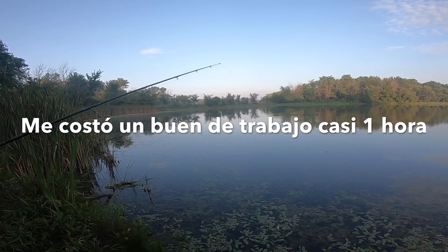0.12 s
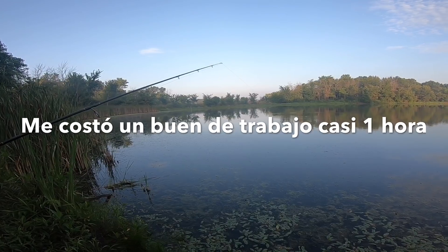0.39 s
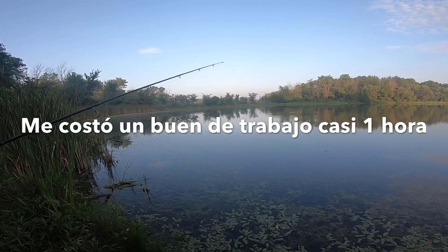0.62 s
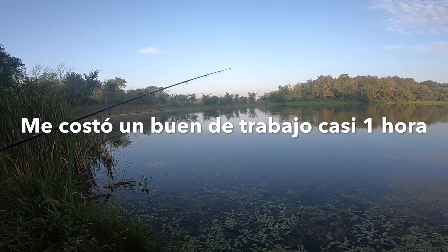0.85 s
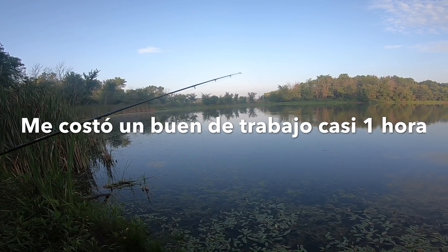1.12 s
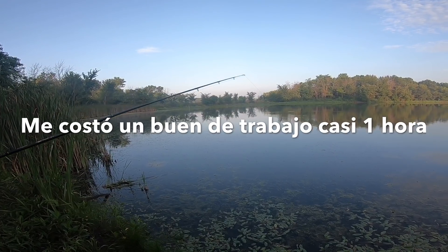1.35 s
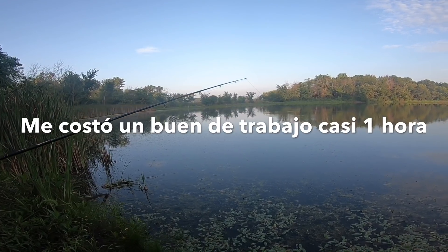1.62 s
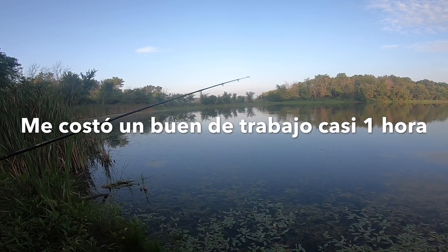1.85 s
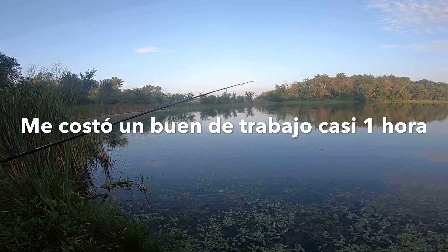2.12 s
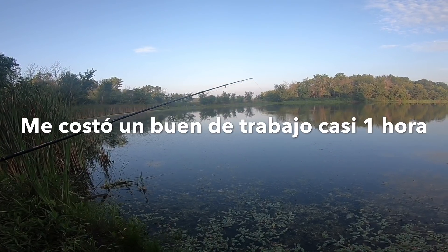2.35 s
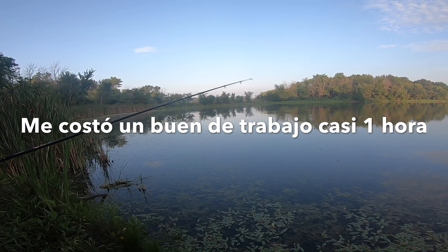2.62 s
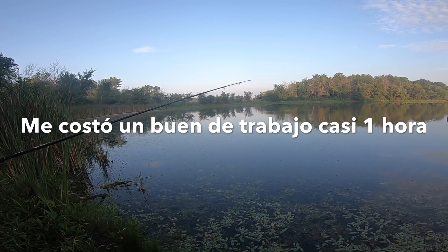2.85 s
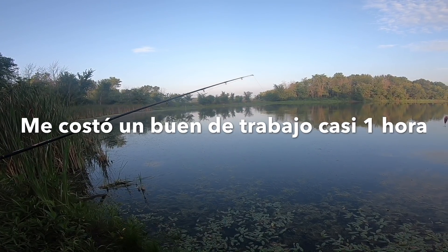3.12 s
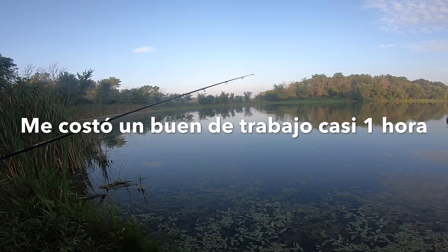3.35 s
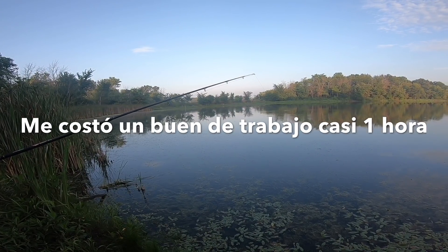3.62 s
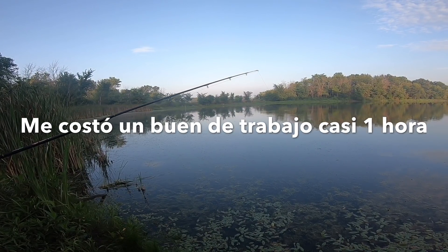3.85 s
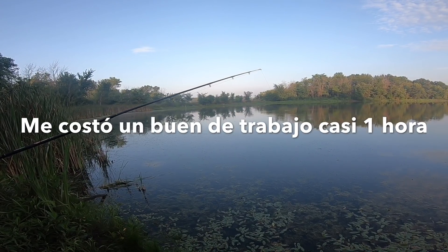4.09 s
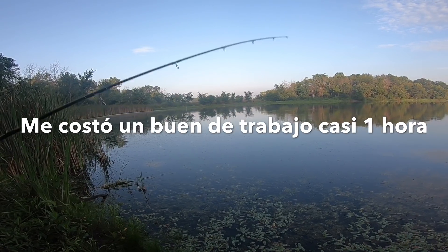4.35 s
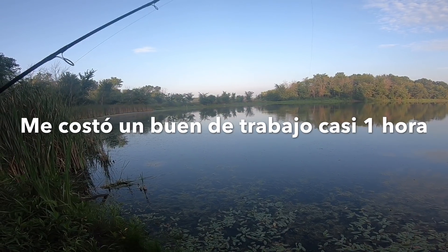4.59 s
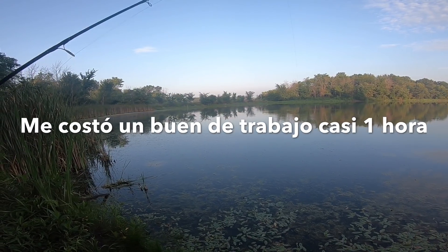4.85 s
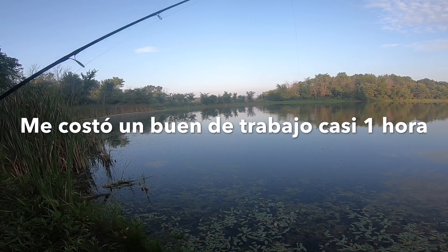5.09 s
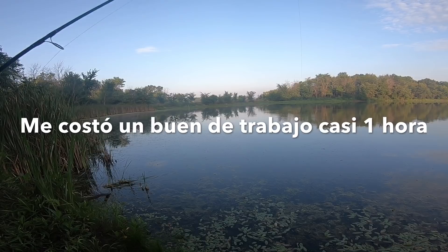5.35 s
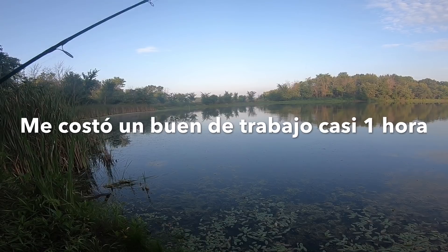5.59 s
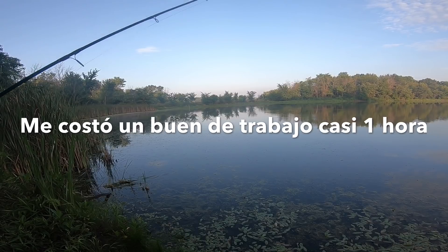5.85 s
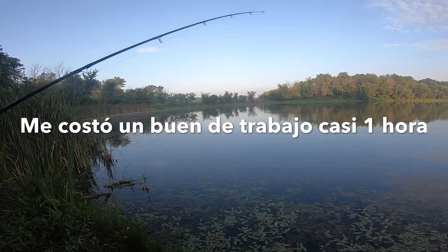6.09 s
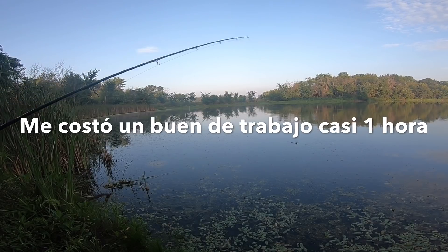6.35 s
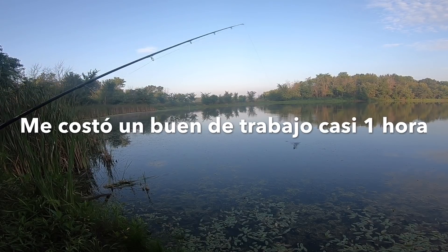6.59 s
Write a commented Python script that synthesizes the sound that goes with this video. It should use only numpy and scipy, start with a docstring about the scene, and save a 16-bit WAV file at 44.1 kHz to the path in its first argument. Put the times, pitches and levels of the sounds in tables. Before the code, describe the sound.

High, silvery insect trilling fills the whole stretch, spread wide in stereo with no single singer standing out. Far traffic murmurs low underneath, a little wind brushes the microphones, and two thin hums waver faintly. A remote engine pulls twice, early and late, with low throbbing drone. Close by, rod and reel tick lightly, finishing with a quick flurry of clicks and grainy rustling.

```python
"""A wide crowd of insects trills near 6 kHz at a lake shore, early morning: noise scraped in bursts, each singer
at its own rate. A distant diesel drones up twice (wavering exhaust orders plus turbulence noise), two thin hums
waver, and fishing tackle ticks (short resonant rings) and rustles (grainy noise) close by. A far road murmurs in
three noise layers and a breath of wind touches the two microphone ports."""
import sys
import numpy as np
from scipy import signal
from scipy.fft import rfft, irfft
from scipy.io import wavfile
from scipy.ndimage import uniform_filter1d

SR = 44100
rng = np.random.default_rng(int(sys.argv[2]) if len(sys.argv) > 2 else 0)


def invert_db(level):
    """Linear amplitude ratio for a level in decibels (20 dB per decade), elementwise."""
    return 10 ** (np.asarray(level, dtype=float) / 20)


def output_pcm(signal):
    """Save a mono or channel-first signal as 16-bit PCM at the path in sys.argv[1].

    Samples are clipped to [-1, 1] before scaling.
    """
    pcm = np.clip(np.atleast_2d(signal).T, -1, 1) * 32767
    wavfile.write(sys.argv[1], SR, np.round(pcm).astype(np.int16))


N = 295911
T = np.arange(N) / SR
FREQ = np.arange(N // 2 + 1) * SR / N + 1  # 1 Hz up, so that log(FREQ) is finite


def curve(table):
    """Columns of a (t/s, value, ..) table at every sample."""
    s, *columns = np.transpose(table)
    return [np.interp(T, s, c) for c in columns]


def along_hz(table):
    """Columns of a (f/Hz, value, ..) table at every bin, interpolated over log frequency."""
    hz, *columns = np.transpose(table)
    return [np.interp(np.log(FREQ), np.log(hz), c) for c in columns]


def unit(x):
    """Scale to rms 1."""
    return x / np.sqrt(np.mean(x ** 2))


def colour(x, table):
    """Filter by a (f/Hz, gain/dB) spectrum."""
    gain_db = along_hz(table)[0]
    return irfft(rfft(x) * invert_db(gain_db), N)


def walk(rate_hz, channels=2):
    """Random levels held 1 / rate_hz and smoothed twice; rms 1."""
    hold = int(SR / rate_hz)
    steps = np.repeat(rng.standard_normal((channels, N // hold + 1)), hold, axis=1)
    smooth = uniform_filter1d(uniform_filter1d(steps, hold), hold)
    return unit(smooth[:, :N])


def swells(steady_db, rows):
    """A steady gain plus bell-shaped swells, rows of (t/s, peak/dB, length/s)."""
    bells = sum(invert_db(db) * np.exp(-(2 * (T - s) / length_s) ** 2) for s, db, length_s in rows)
    return invert_db(steady_db) + bells


def tone(hz, waver_db, rate_hz, drift_rad):
    """Two versions of a far tone: the air makes its level and phase waver."""
    wobble = walk(rate_hz, channels=4)
    # the second phase roams six times as far, so the left-right balance does not hang on the starting phases
    roam = drift_rad * wobble[:2] * [[1], [6]]
    start = rng.uniform(0, 2 * np.pi, (2, 1))
    phase = 2 * np.pi * np.cumsum(hz * np.ones(N)) / SR + roam + start
    return unit(invert_db(waver_db * wobble[2:]) * np.sin(phase))


def insects(count=48, trill_hz=45, spread=.4, sharp=0.49):
    """Each singer scrapes its wing in bursts at its own trill rate; wings ring near 6 kHz, with a faint high band."""
    # wing resonance: f/Hz, relative level/dB
    wing_ring = [(2500, -67), (4300, -38.5), (4660, -28.5), (5250, -9), (5700, -2.5), (6000, 4.5),
                 (6200, 5), (6500, -3), (6850, -15.5), (7150, -34.5), (7600, -41), (8500, -81.5),
                 (16000, -120)][:-1]
    # faint high band of the chorus, strongest near 10.5 kHz: f/Hz, relative level/dB
    high_band = [(7000, -120)] + [(8000, -79), (9500, -61), (10500, -40.5), (12000, -50), (13000, -52.5),
                                  (14000, -68), (15000, -80)]
    chorus_db = -44  # rms of the wing band

    rate_hz = trill_hz * np.exp(spread * rng.standard_normal((count, 1)))
    near = invert_db(1.33 * rng.standard_normal((count, 1)))
    start = rng.random((count, 1))
    coarse = T[::16]
    # trills speed up and slow down a little, out of step with each other
    slip_cycles = 0.022 * np.cumsum(rng.standard_normal((count, len(coarse))), axis=1)
    cycles = rate_hz * coarse + start + slip_cycles
    bursts = near * np.exp(sharp * np.cos(2 * np.pi * cycles))
    # unrelated scrapes add in power, half of the crowd in each version
    power = (bursts ** 2).reshape(2, count // 2, -1).sum(axis=1)
    effort = np.array([np.interp(T, coarse, unit(np.sqrt(p))) for p in power])
    scrape = effort * rng.standard_normal((2, N))
    wing = colour(scrape, wing_ring) * invert_db(0.1 * walk(9.8))
    both = wing + colour(scrape, high_band)
    return both / np.std(wing) * invert_db(chorus_db)


def engine():
    """Exhaust orders of a cycle near 25 Hz, third strongest, with turbulence; a second drone near 100 Hz."""
    # distant engine pulling twice: t/s, third order f/Hz, third order level/dB
    pull = [(0, 71, -45), (.4, 69.5, -60), (1.12, 70, -50.5), (1.25, 72, -43.5), (1.74, 73.5, -36),
            (1.8, 74.5, -50), (1.92, 74.7, -35), (2.2, 74.8, -39.5), (2.52, 74.8, -31.5), (2.76, 74.4, -43),
            (2.88, 73.4, -37), (3.2, 72, -58), (4.7, 68, -58), (5.12, 69.5, -48.5), (5.31, 73.2, -35.5),
            (5.65, 74.5, -36), (5.84, 75.1, -29.5), (5.92, 76, -39.5), (6.13, 76.2, -28.5),
            (6.22, 76.2, -42.5), (6.35, 74.5, -39), (6.45, 71, -52.5), (6.71, 71, -54)]
    # weaker orders: multiple of the cycle rate, level at mean load/dB
    weak_orders = [(2, -58.5), (5, -59), (6, -55.5), (8, -57), (9, -59.5), (10, -61.5), (12, -66)]
    # exhaust turbulence: f/Hz, relative level/dB
    turbulence_colour = [(25, -28), (45, 8), (75, 6), (105, 9.5), (140, 0.5), (220, -45), (500, -120)]
    # second drone: t/s, peak/dB, length/s
    drone_bells = [(0.085, -42, .3), (.66, -52, 0.13), (0.905, -37, 0.16), (1.35, -44.5, 0.16),
                   (1.898, -47.5, 0.85), (2.5, -45.5, 0.34), (3.83, -46.5, 0.21), (4.198, -50, 0.26)]
    drone_start_hz, sag_hz_per_s, drone_db = 102.4, 0.91, -59

    third_hz, third_db = curve(pull)
    load_db = uniform_filter1d(third_db, SR // 4) - third_db.mean()
    third = tone(third_hz, 1.1, 14, 0.36) * invert_db(third_db)
    drone_hz = drone_start_hz - sag_hz_per_s * T
    drone = tone(drone_hz, 2.0, 7.2, 0.29) * swells(drone_db, drone_bells)
    turbulence = unit(colour(rng.standard_normal((2, N)), turbulence_colour)) * invert_db(-46.5 + 0.31 * load_db)
    out = third + drone + turbulence
    for order, db in weak_orders:
        out += tone(third_hz * order / 3, 3.5, 10, 1.37) * invert_db(db + 0.27 * load_db)
    return out


def hums():
    """Two thin tones from far machinery that waver and swell."""
    # steady hums: f/Hz, level/dB
    hum_tones = [(346, -70.5), (384.9, -74)]
    # swells: hum index, t/s, peak/dB, length/s
    hum_bells = [(0, 1.2, -63.5, .9), (0, 3.39, -60, 0.39), (0, 4.56, -64.5, 1.1), (1, 0.56, -55.5, .7),
                 (1, 1.6, -63.5, 0.9), (1, 3.4, -55.5, 0.28), (1, 4.5, -65, 1), (1, 6.17, -68, 1.1)]
    out = 0
    for k, (hz, db) in enumerate(hum_tones):
        own_bells = [row[1:] for row in hum_bells if round(row[0]) == k]
        out = out + tone(hz, 2.5, 8, 1.2) * swells(db, own_bells)
    return out


def tackle():
    """Short noise-fed rings of rod, line and reel, then a grainy rustle as the line is wound."""
    # ticks and creaks: t/s, peak/dB, ring f/Hz, length/s, left minus right/dB
    tick_rows = [(0.048, -59, 1930, 0.024, 7), (2.492, -74, 3310, 0.02, 8), (2.94, -60, 2080, 0.043, -6),
                 (2.938, -73, 3930, .022, -5.5), (4.371, -63.5, 1800, .006, 10),
                 (5.542, -67, 3500, 0.0053, -5), (5.603, -63, 1710, .012, 10), (5.69, -64, 1600, .025, 3),
                 (6.365, -65, 1620, .1, 5), (6.434, -58, 3470, .004, -6), (6.46, -64, 3200, .005, -3),
                 (6.485, -59, 2270, 0.021, -10), (6.502, -52.5, 5150, .005, 1),
                 (6.521, -59.5, 3400, 0.0064, -4), (6.543, -59, 3900, .006, -3),
                 (6.592, -77, 7500, 0.0066, 1), (6.678, -63, 1500, 0.031, 3)]
    # line and reel rustle: f/Hz, relative level/dB
    rustle_spectrum = [(1200, -22), (2300, -3.5), (3500, 2), (5000, -10), (8000, -10), (9000, -22),
                       (14000, -31)]
    width_times_length = 9.7  # bandwidth/Hz x length/s: the shorter a tick, the broader its ring
    peak_s, peak_db, rise_db_per_s, fall_db_per_s = 6.51, -59, 150, 160  # rustle

    out = np.zeros((2, N))
    t = np.arange(-SR // 4, SR // 4) / SR
    for s, db, hz, length_s, pan_db in tick_rows:
        b, a = signal.iirpeak(hz, hz * length_s / width_times_length, SR)
        once = signal.lfilter(b, a, rng.standard_normal(len(t)))
        ring = unit(signal.lfilter(b, a, once))
        ring = ring * np.exp(-(2 * t / length_s) ** 2) * invert_db(db)
        at = int(s * SR) + np.arange(len(t)) - SR // 4
        inside = (at >= 0) & (at < N)
        out[:, at[inside]] += ring[inside] * invert_db(np.array([[pan_db], [-pan_db]]) / 2)
    rustle_db = peak_db - np.maximum(rise_db_per_s * (peak_s - T), fall_db_per_s * (T - peak_s))
    grains = rng.standard_normal((2, N)) * invert_db(4 * walk(300))
    return out + unit(colour(grains, rustle_spectrum)) * invert_db(rustle_db)


def road():
    """Three broad noise layers of far traffic, fading together while the treble comes and goes."""
    # fades: t/s, relative level/dB, extra treble/dB
    fades = [(0, 2, 0), (1.2, 1, 0), (2.2, 0, 1), (3, 0, 0), (4.4, .5, -4.5), (5, 0.5, -3.5),
             (5.4, -1.5, 1.5), (5.7, -4, 5.5), (6.71, -1.5, 4.5)]
    # traffic spectrum: f/Hz, relative level/dB
    road_spectrum = [(12, -32), (20, -1.5), (87, -6), (124, -4), (200, -3.5), (293, -8), (321, -11.5),
                     (385, -13.5), (421, -15.5), (527, -20.5), (828, -17), (907, -17.5), (1360, -19.5),
                     (2800, -38), (4400, -48.5), (5720, -76), (9680, -120)][1:-1] + [(9000, -62)]
    # rumble, tyre roar, top hiss: low f/Hz, high f/Hz, factor on extra treble, lumpiness/dB
    layers = [(0.99, 480, 0, 1.58), (483, 3140, 0.27, 0.68), (2580, 8700, 1.1, .9)]

    out = 0
    level_db, treble_db = curve(fades)
    for low_hz, high_hz, treble, lumpy_db in layers:
        noise = colour(rng.standard_normal((2, N)), road_spectrum)
        power_share = 1 / (1 + (FREQ / high_hz) ** 4) - 1 / (1 + (FREQ / low_hz) ** 4)
        layer = irfft(rfft(noise) * np.sqrt(np.clip(power_share, 0, 1)), N)
        out = out + layer * invert_db(level_db + treble * treble_db + lumpy_db * walk(6.6))
    return unit(out) * invert_db(-45)


def wind():
    """A breath of air on each port: low noise, unrelated left and right."""
    # breeze: f/Hz, relative level/dB
    breeze_spectrum = [(10, -10), (22, 6), (45, 1.5), (90, -20), (200, -65.5), (500, -120)]
    wind_db, left_minus_right_db = -54.5, 3  # the left port faces the breeze
    side_db = left_minus_right_db * np.array([[1], [-1]]) / 2
    air = unit(colour(rng.standard_normal((2, N)), breeze_spectrum))
    return air * invert_db(wind_db + side_db + 2.6 * walk(1.9))


def ports(pair):
    """Two versions of a far sound become left and right: part shared, shifted in phase, part their own."""
    # microphone ports: f/Hz, left minus right/dB, likeness 0-1, left lead/rad
    port_rows = [(25, -6, .55, 0), (80, -2, .93, -.1), (200, -3.5, .82, -.15), (400, -5, .87, -.2),
                 (560, -7, .3, -.5), (700, -9, .15, .5), (950, -7, .7, 1.9), (1500, -5.5, .68, 1.9),
                 (2100, -5, .55, 1.6), (2800, -4, .32, 1.4), (4100, -.5, .55, .3), (5300, -1, .36, 2.2),
                 (5600, -1, .05, 2.3), (5900, -1, .3, 2.2), (6400, -1, .43, 2.3), (6900, -.5, .3, 3.6),
                 (7300, -.5, .6, 3.2), (10000, 0, .05, 0)]
    a, b = rfft(pair)
    pan_db, alike, lead_rad = along_hz(port_rows)
    alike = np.clip(alike, 0, 1)
    shared = alike * np.exp(1j * lead_rad) * a
    own = np.sqrt(1 - alike ** 2) * b
    left = (shared + own) * invert_db(pan_db / 2)
    right = a * invert_db(-pan_db / 2)
    return irfft(np.array([left, right]), N)


def scene():
    """Far sounds reach both ports from all sides; wind and tackle are close."""
    far = ports(insects() + road() + engine() + hums())
    return far + wind() + tackle()


def top_cut(x):
    """Nothing passes above the cut-off."""
    return signal.sosfilt(signal.butter(12, 13480, fs=SR, output="sos"), x)


def record(dry):
    """Both ports as stored."""
    return top_cut(dry)


dry = scene()
out = record(dry)
output_pcm(out)
```